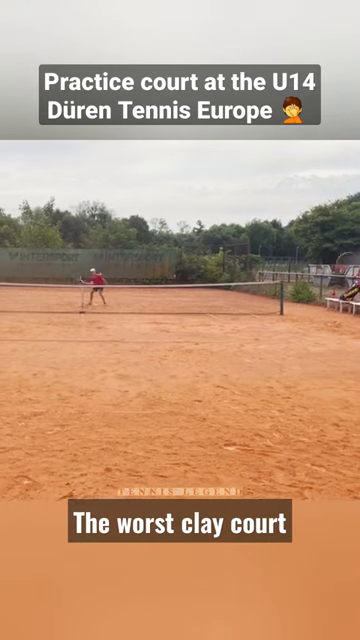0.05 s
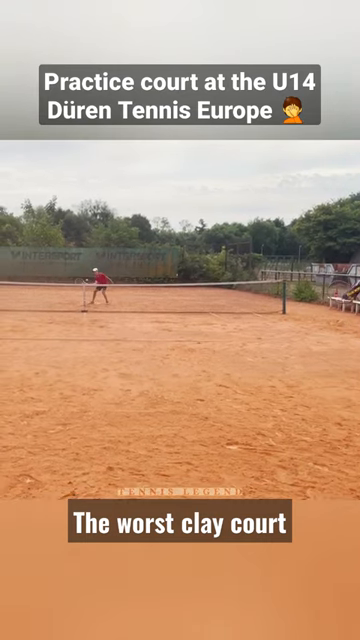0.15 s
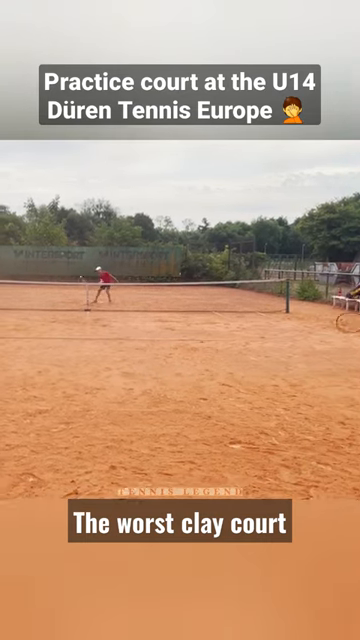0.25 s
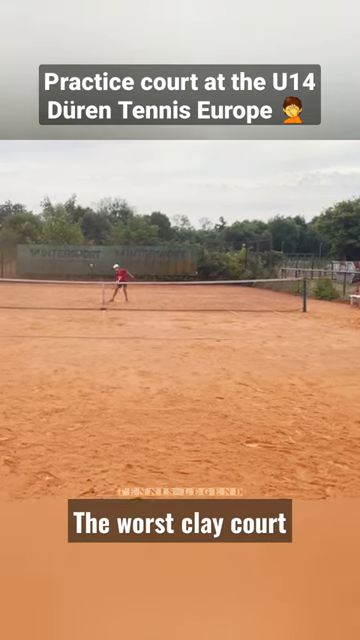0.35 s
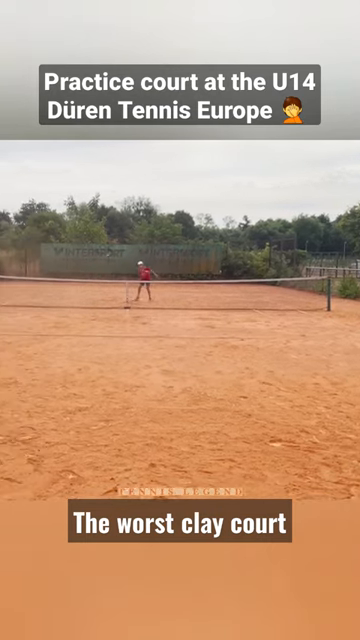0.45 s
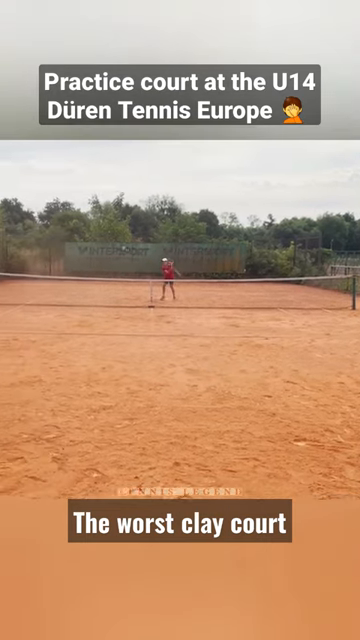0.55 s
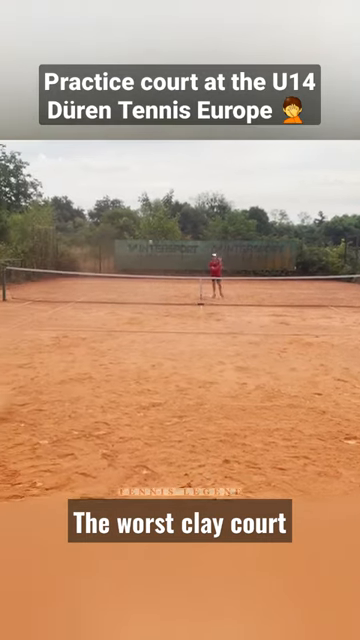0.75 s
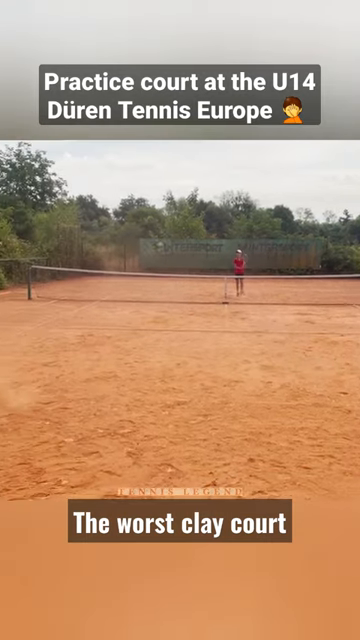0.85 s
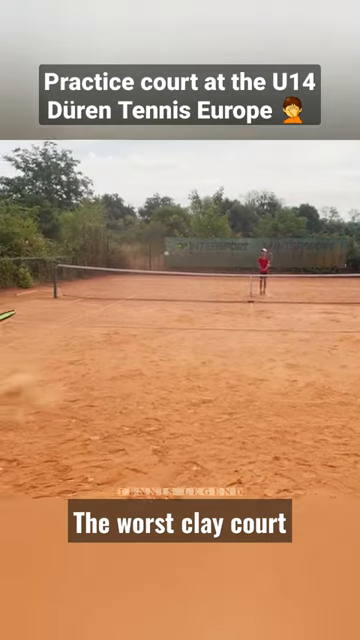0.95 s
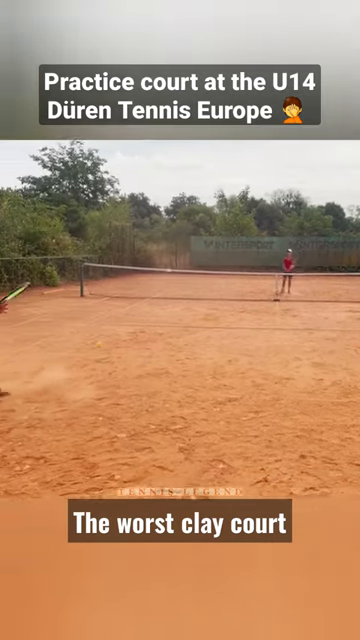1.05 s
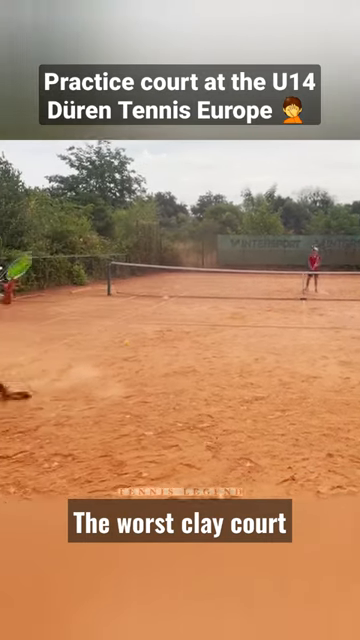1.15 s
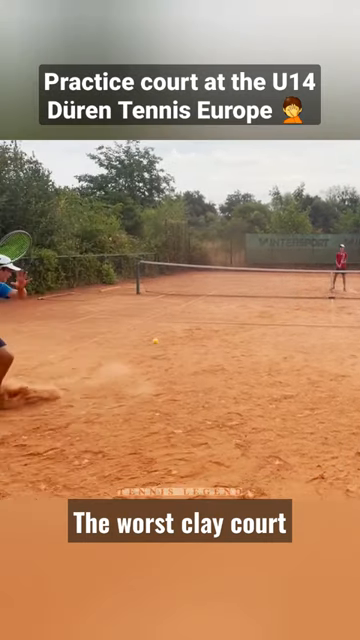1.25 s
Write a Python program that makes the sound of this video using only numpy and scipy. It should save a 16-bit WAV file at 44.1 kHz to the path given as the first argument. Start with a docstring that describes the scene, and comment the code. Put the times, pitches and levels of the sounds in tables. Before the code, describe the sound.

A racket sharply hits a tennis ball, then shoes scuff and slide on clay.

```python
"""Tennis on a clay court

A ball is struck close by: the strings crack and ring, the ball gives a hollow pock, and the ground
and the fences answer. Shoes scuff, knock and slide in the loose grit, with a few small taps and dull
bumps, and the ball lands far off. A low wind rumble and the distant hum of the outdoors lie underneath."""
import sys
import numpy as np
from scipy import signal
from scipy.fft import rfft, irfft, next_fast_len
from scipy.io import wavfile
from scipy.ndimage import map_coordinates

SR = 44100
rng = np.random.default_rng(int(sys.argv[2]) if len(sys.argv) > 2 else 0)


def materialize(psi):
    """Save the field psi as 16-bit PCM at rate SR to the path in sys.argv[1].

    A 1-D psi becomes a single channel; in a 2-D psi each row is a channel.
    """
    bounded = np.clip(np.atleast_2d(psi).T, -1, 1)
    quanta = np.round(bounded * 32767).astype(np.int16)
    wavfile.write(sys.argv[1], SR, quanta)


N = 57330  # 1.3 seconds


def amp(db):
    """Turn decibels into a number to multiply by."""
    return 10 ** (np.asarray(db) / 20)


def unit(x):
    """Scale a sound to an average (rms) size of 1."""
    return x / np.sqrt(np.mean(x ** 2) + 1e-20)


def clock():
    """The time of each sample, in seconds."""
    return np.arange(N) / SR


def white():
    """Two unrelated white noises."""
    return rng.standard_normal((2, N))


def wobble(per_s):
    """A smooth curve through per_s random values a second."""
    return map_coordinates(rng.standard_normal(int(N * per_s / SR) + 4), [clock() * per_s])


def struck(start, attack, t60):
    """A quick rise, then a fade of 60 dB in t60 seconds."""
    t = np.maximum(clock() - start, 0)
    return (1 - np.exp(-t / attack)) * np.exp(-np.log(1000) * t / t60)


def swell(peak_s, half_width_s):
    """A bell-shaped rise and fall."""
    return np.exp(-((clock() - peak_s) / half_width_s) ** 2)


def along(table, hz):
    """Read between the rows of a (frequency, value) table, on a log frequency scale."""
    freqs, values = np.transpose(table)
    return np.interp(np.log(hz + 1), np.log(freqs + 1), values)


def filtered(x, response):
    """Multiply each frequency in x by response(hz)."""
    size = next_fast_len(N + SR // 2)
    return irfft(rfft(x, size) * response(np.fft.rfftfreq(size, 1 / SR)), size)[..., :N]


def coloured(pair, tone, likeness):
    """Give two noises a tone and a left-right likeness (0 is unrelated, 1 is the same)."""
    def response(hz):
        angle = np.arccos(np.clip(along(likeness, hz), -1, 1)) / 2
        return amp(along(tone, hz)) * [np.cos(angle), np.sin(angle)]
    mid, side = filtered(pair, response)
    return unit(np.array([mid + side, mid - side]))


def shifted(sound, phase):
    """Put the left channel ahead of the right by phase(hz) radians."""
    return filtered(sound, lambda hz: np.exp(.5j * np.array([phase(hz), -phase(hz)])))


# Tone of the wind and of the distant hum (frequency [Hz], level [dB])
WIND_TONE = [(15, -37), (30, -20), (45, -1), (60, 0.5), (85, -3), (130, -7), (200, -15.5), (400, -32.5),
             (1000, -82)]
HUM_TONE = [(60, -11.5), (160, -1), (290, -1), (380, -4.5), (500, -10), (900, -13.5), (1400, -17),
            (2200, -25.5), (3200, -34.5), (5500, -37.5), (7500, -42.5), (11000, -45.5), (14000, -61)]
# How each gets louder and softer (time [s], level [dB])
WIND_LEVEL = [(0, -49), (.04, -58), (.13, -51.5), (.16, -57.5), (.22, -43.5), (.26, -62.5), (.33, -49.5),
              (.38, -49.5), (.48, -57), (.52, -46.5), (.57, -54.5), (.63, -52), (.7, -56), (.76, -50),
              (.9, -50.5), (.98, -57), (1.1, -48.5), (1.14, -56.5), (1.2, -50.5), (1.3, -53.5)]
HUM_LEVEL = [(0, -57.5), (.3, -60), (.7, -57), (1.3, -58.5)]
# How alike left and right are in the open air (frequency [Hz], likeness [0 to 1])
AIR_LIKENESS = [(100, 0.92), (300, 0.74), (800, 0.037), (2500, 0.22), (5500, 0.71), (8000, 0.85)]


def outdoors():
    """Wind rumbles in the middle, and the surroundings hum more widely around it."""
    level = lambda table: amp(np.interp(clock(), *np.transpose(table)))
    wind = level(WIND_LEVEL) * coloured(white(), WIND_TONE, likeness=[(60, 0.98)])
    hum = level(HUM_LEVEL) * coloured(white(), HUM_TONE, AIR_LIKENESS)
    return wind + hum


# Soft low bumps (time [s], pitch [Hz], level [dB])
LOW_BUMPS = [(.08, 132.5, -51.5), (.805, 121.5, -47.5), (.878, 112.9, -50.5), (1.005, 139.1, -56.5),
             (1.106, 275, -53), (1.193, 221.7, -50.5), (1.256, 279, -51), (1.295, 202.4, -47.5)]


def bumps():
    """Dull, low swells, each only a few vibrations long."""
    t = clock()
    return sum(amp(db) * swell(at, half_width_s=0.013) * np.sin(2 * np.pi * hz * t + .5 * wobble(80))
               for at, hz, db in LOW_BUMPS)


# Shoe scuffs (peak time [s], rise [s], fall [s], sole level [dB], grit level [dB], sand level [dB])
SHOE_SCUFFS = [(.162, 0.0067, 0.052, -57.5, -69, -85.5), (0.251, 0.028, 0.28, -64, -72.5, -100),
               (.535, .004, .025, -62, -69.5, -92), (0.564, 0.017, 0.024, -54, -63.5, -79.5),
               (0.636, 0.0084, 0.046, -61.5, -67.5, -92), (0.789, 0.02, 0.032, -56, -68, -80),
               (0.894, 0.014, 0.017, -62, -70, -100), (0.944, 0.011, 0.066, -61.5, -75.5, -100),
               (1.024, 0.0072, 0.0083, -58.5, -64, -78), (1.075, 0.049, 0.075, -60, -69.5, -79),
               (1.175, 0.031, 0.061, -78, -75.5, -84), (1.195, 0.013, 0.068, -65.5, -75.5, -100),
               (1.248, 0.0061, 0.011, -59, -79.5, -100), (1.288, 0.0084, 0.025, -60, -73, -88)]
# Tone of the rubbing sole, the crunching grit and the fine sand (frequency [Hz], level [dB])
SOLE_TONE = [(100, -17), (250, -3.5), (400, -3), (550, -4.5), (830, 0), (1300, -7.5), (1500, -9),
             (1750, -5), (2000, -18), (2250, -6.5), (2900, -16.5), (6000, -28.5), (12000, -68)]
GRIT_TONE = [(400, -6), (1200, -8.5), (2400, 0.5), (3000, 0.5), (4000, -1), (5400, -1), (6300, -7),
             (7200, -11), (9500, -24), (12000, -28), (13500, -31)]
SAND_TONE = [(4000, -19), (7500, 0), (9500, 4), (12500, -1.5), (13600, -13)]
# How alike left and right are for the sole and for grit and sand (frequency [Hz], likeness [0 to 1])
SOLE_LIKENESS = [(150, 0.61), (400, 0.52), (900, 0.52), (2200, 0.1)]
GRIT_LIKENESS = [(1500, 0.25), (3000, 0.61), (5200, 1), (8000, 0.68), (12000, 1)]


def scuffs(grains_per_s=2500, grain_spread_db=3.5, grip_db=1, pan_db=1, left_lead_s=0.00021):
    """In each scuff the sole rubs the clay, crunches the grit and throws up fine sand."""
    t, power = clock(), np.zeros((3, N))
    for at, rise, fall, sole_db, grit_db, sand_db in SHOE_SCUFFS:
        stroke = np.where(t < at, swell(at, rise), np.exp(-2 * np.abs(t - at) / fall))
        power += amp([[sole_db], [grit_db], [sand_db]]) ** 2 * stroke
    sole_level, grit_level, sand_level = np.sqrt(power)
    clicks = white() * (rng.random(N) < grains_per_s / SR)
    grains = unit(clicks * amp(grain_spread_db * rng.standard_normal(N)))
    sole = sole_level * coloured(white(), SOLE_TONE, SOLE_LIKENESS)
    grit = grit_level * coloured(grains + .7 * white(), GRIT_TONE, GRIT_LIKENESS)
    sand = sand_level * coloured(white(), SAND_TONE, GRIT_LIKENESS)
    grip = amp(grip_db * wobble(130))  # the sole grips and slips unevenly
    # The shoes are on the left, so that side is louder and hears them first.
    panned = (sole + grit + sand) * grip * amp([[pan_db], [-pan_db]])
    return shifted(panned, lambda hz: 2 * np.pi * np.minimum(hz, 4970) * left_lead_s)


HIT_S = 0.3292  # the ball meets the strings
# Ball and strings flexing (pitch [Hz], level [dB], peak after contact [s], half width [s])
BALL_POCK = [(168, -33, 0.0067, 0.0051), (318.3, -22, 0.00638, 0.003), (843, -21.5, 0.00507, 0.0013),
             (1370, -38, 0.0051, 0.0026)]
# Ringing of ball, strings and frame (pitch [Hz], level [dB], time to fade 60 dB [s])
RACKET_RING = [(805, -43, .028), (995, -42, .07), (1400, -55, .02), (1690, -44.5, .07), (1765, -48, .055),
               (2000, -47.5, .1), (2203, -38.5, .036), (2503, -57, .11), (2620, -57, .1), (2880, -41, .028),
               (3660, -49, .04), (3700, -46, .045), (4250, -53, .045), (5475, -41.5, .018)]
# Tone of the crack and of the snap, its bright first instant (frequency [Hz], level [dB])
CRACK_TONE = [(300, 5.5), (1000, -3), (1700, 7), (2800, -8), (3300, -11), (4100, -3.5), (4700, -8.5),
              (5500, -4), (6300, -19), (7200, -11), (10000, -23), (13500, -33)]
SNAP_TONE = [(1000, -30), (4300, -19), (5500, 4), (6500, -2), (7500, -4), (9200, 0), (10500, -23),
             (12000, -10.5), (13500, -25)]


def racket():
    """A crack at first touch, a pock as the ball flattens and springs back, then strings and frame ring."""
    t = clock() - HIT_S
    pock = sum(amp(db) * swell(HIT_S + delay, half_width) * np.cos(2 * np.pi * hz * (t - delay))
               for hz, db, delay, half_width in BALL_POCK)
    ring = sum(amp(db) * struck(HIT_S, 0.001, t60) * np.sin(2 * np.pi * hz * t + .38 * wobble(250))
               for hz, db, t60 in RACKET_RING)
    crack_noise = coloured(white(), CRACK_TONE, likeness=[(1000, 0.95)])
    crack = amp(-35) * struck(HIT_S, attack=0.00045, t60=0.034) * crack_noise
    snap_noise = coloured(white(), SNAP_TONE, likeness=[(1000, 0.79)])
    snap = amp(-39) * struck(HIT_S, attack=0.00045, t60=0.0096) * snap_noise
    return pock + ring + crack + snap


def reflection(sound, delay_s, low_hz, high_hz):
    """A surface sends the sound back late and keeps only a band of its frequencies."""
    def response(hz):
        low_cut = 1 - 1 / (1 + (hz / low_hz) ** 12)
        high_cut = 1 / (1 + (hz / high_hz) ** 6)
        return np.exp(-2j * np.pi * hz * delay_s) * low_cut * high_cut
    return filtered(sound, response)


def smeared(sound, tail):
    """Spread a sound out in time by giving every sample this tail."""
    return signal.fftconvolve(sound, tail / np.linalg.norm(tail[0]), axes=1)[:, :N]


# Echoes off fences and walls (delay [s], level [dB], smeared share [dB], low edge [Hz], high edge [Hz])
FENCE_ECHOES = [(0.022, -3, -29, 927, 1150), (0.026, -23, -4, 1110, 2400), (.039, -15, -16, 960, 1190),
                (.047, -5.5, -5, 2720, 3340), (.062, -15.5, -8, 151, 350), (.093, -17.5, -13, 2370, 7040)]
# How long the court's reverb lasts (frequency [Hz], time to fade 60 dB [s])
REVERB_FADE = [(150, 0.15), (400, 0.64), (1000, 0.42), (3000, 0.57), (10000, 0.21)]
# Tone of that reverb (frequency [Hz], level [dB])
REVERB_TONE = [(300, -5), (650, -1.5), (850, -7), (1000, 7), (1300, -9), (2000, -1), (2700, 3.5),
               (3700, -4), (7000, 3), (11000, -13)]


def court(hit):
    """The hit with its reflection off the clay, smeared echoes from the fences and a thin reverb."""
    sound = hit + amp(-8.5) * reflection(hit, delay_s=0.00617, low_hz=734, high_hz=1690)
    for delay, db, smear_db, low_hz, high_hz in FENCE_ECHOES:
        echo = reflection(hit, delay, low_hz, high_hz)
        smear = smeared(echo, white() * struck(0, attack=0.001, t60=0.061))
        sound += amp(db) * (echo + amp(smear_db) * smear)
    freqs, t, noise_bands = signal.stft(white(), SR, nperseg=256)
    fade = np.exp(-np.log(1000) * t / along(REVERB_FADE, freqs)[:, None])
    build_up = 1 - np.exp(-t / 0.0072)
    _, tail = signal.istft(noise_bands * fade * build_up, SR, nperseg=256)
    reverb = filtered(smeared(hit, tail), lambda hz: amp(along(REVERB_TONE, hz)))
    return sound + amp(-16) * reverb


# Tone of the wash after the hit (frequency [Hz], level [dB])
SCATTER_TONE = [(500, -31), (800, -18), (980, -1.5), (1200, -4), (2000, 0.5), (2600, 10), (3400, -3.5),
                (4500, -3.5), (5500, -7.5), (7000, -11.5), (11000, -21.5), (13500, -43)]


def scatter():
    """A wash of noise: the rough ground and the wire fence scatter the hit back."""
    wash = coloured(white(), SCATTER_TONE, AIR_LIKENESS)
    return amp(-53) * struck(HIT_S, attack=0.011, t60=0.36) * wash


# Small taps (time [s], level [dB])
CLAY_TAPS = [(0.529, -58), (0.6318, -55), (0.9354, -58.5), (0.943, -56), (1.2825, -54.5)]
# Their tone (frequency [Hz], level [dB])
TAP_TONE = [(200, -16), (600, -1), (850, 4), (1100, 9), (1650, 1), (1950, 8), (2250, 3.5), (2600, -7),
            (3100, -11), (4200, -14.5), (7000, -30), (12000, -35)]


def taps():
    """Short dry taps on the clay, each a tiny burst of noise."""
    bursts = sum(amp(db) * struck(at, attack=0.00017, t60=0.013) for at, db in CLAY_TAPS)
    return bursts * coloured(white(), TAP_TONE, likeness=[(1000, 0.17)])


# Heavy steps (time [s], level [dB])
STEPS = [(0.557, -53.5), (0.779, -60), (0.889, -44.5), (1.023, -54)]
# Notes in a shoe's knock (pitch [Hz], level added to the step's [dB], time to fade 60 dB [s])
SHOE_NOTES = [(373.6, -1.5, 0.063), (930, -6.5, 0.063), (1740, -10, .04), (2164, -3.5, 0.032)]


def footfalls():
    """The shoe gives a soft hollow knock as it takes the weight."""
    knocks = np.zeros(N)
    for at, step_db in STEPS:
        for hz, note_db, t60 in SHOE_NOTES:
            note = np.sin(2 * np.pi * hz * clock() + .7 * wobble(130))
            knocks += amp(step_db + note_db) * struck(at, attack=0.0028, t60=t60) * note
    return knocks


# Judders of the sole (time [s], half width [s], pitch [Hz], level [dB])
SOLE_JUDDERS = [(0.57, 0.013, 721.4, -58.5), (0.791, 0.0095, 835.5, -57.5), (1.031, 0.0086, 1030, -56.5),
                (1.055, 0.016, 806.5, -61), (1.094, .014, 1041, -65), (1.204, 0.019, 792, -60.5)]


def judders(rough_db=3, wobbles_per_s=220):
    """The sliding sole sticks and slips at a rough, hollow pitch."""
    sound = np.zeros(N)
    for at, half_width, hz, db in SOLE_JUDDERS:
        level = amp(db + rough_db * wobble(wobbles_per_s)) * swell(at, half_width)
        sound += level * np.sin(2 * np.pi * hz * clock() + .8 * wobble(wobbles_per_s))
    return sound


# Notes of the landing ball (pitch [Hz], relative level [dB], time to fade 60 dB [s])
BOUNCE_NOTES = [(920, -5, 0.017), (1570, 2.5, .006), (2340, -1, 0.0059), (3020, -9, 0.009),
                (4600, -24, .003)]


def bounce(lands_s=.9678, low_cut_hz=746, right_lead_s=.0001):
    """The ball lands on the far side with one sharp, thin tick that reaches the right first."""
    t = clock() - lands_s
    tick = sum(amp(db) * struck(lands_s, attack=.00005, t60=t60) * np.sin(2 * np.pi * hz * t)
               for hz, db, t60 in BOUNCE_NOTES)
    thin = filtered(tick, lambda hz: 1 - 1 / (1 + (hz / low_cut_hz) ** 4))
    return amp(-44) * shifted(thin, lambda hz: -2 * np.pi * hz * right_lead_s)


def squeak(peak_s=1.167, middle_hz=4400, rise_hz_per_s=26000):
    """The sole gives a faint rising squeak near the end of the slide."""
    glide = middle_hz + rise_hz_per_s * (clock() - peak_s)
    hz = np.clip(glide + 50 * wobble(290), 0, SR / 2)
    return amp(-72.5) * swell(peak_s, half_width_s=.018) * np.sin(2 * np.pi * np.cumsum(hz) / SR)


def scene():
    """The open air, the footwork, the stroke and the bounce, added together."""
    return (outdoors() + bumps() + scuffs() + court(racket()) + scatter()
            + taps() + footfalls() + judders() + bounce() + squeak())


# How far the left microphone is ahead of the right (frequency [Hz], phase [radians])
MIC_PHASE = [(200, 0), (2400, 0.39), (4800, 0.63), (6000, 0.67), (8150, -3.5), (10700, -5.5)]
# A microphone notch in what left and right share (frequency [Hz], level [dB])
MID_TONE = [(7400, 0), (8200, -15.5), (8900, -0.5)]
# A drop in stereo width at the very top (frequency [Hz], level [dB])
SIDE_TONE = [(10000, 0.5), (11000, -7)]


def record(dry, top_hz=13600, edge_hz=80):
    """Left and right fall out of step in the treble, which is notched, narrows toward mono
    and is cut off at the very top."""
    left, right = shifted(dry, lambda hz: along(MIC_PHASE, hz))
    mid = filtered((left + right) / 2, lambda hz: amp(along(MID_TONE, hz)))
    side = filtered((left - right) / 2, lambda hz: amp(along(SIDE_TONE, hz)))
    stereo = np.array([mid + side, mid - side])
    return filtered(stereo, lambda hz: .5 - .5 * np.tanh((hz - top_hz) / edge_hz))


dry = scene()
out = record(dry)
materialize(out)
```